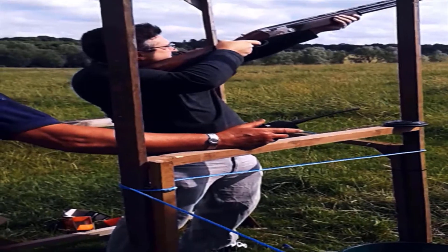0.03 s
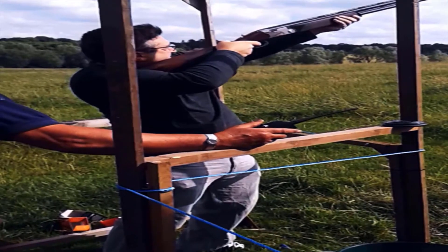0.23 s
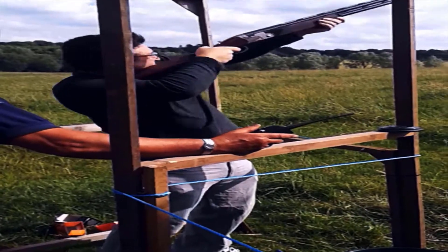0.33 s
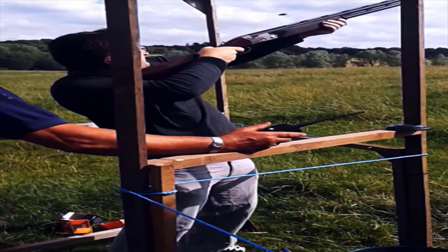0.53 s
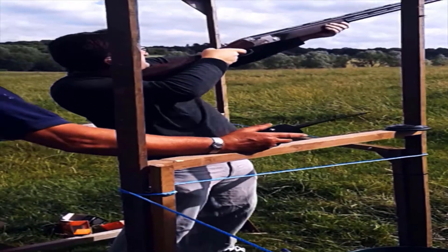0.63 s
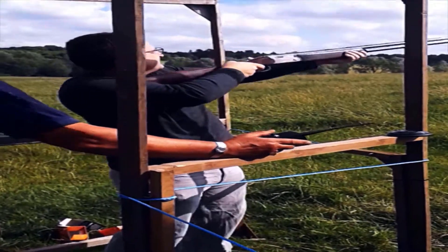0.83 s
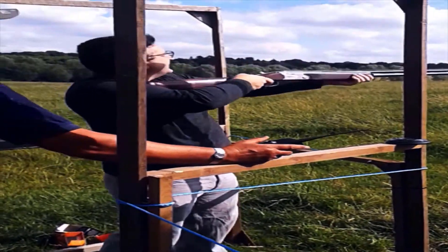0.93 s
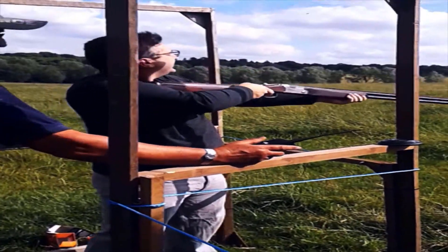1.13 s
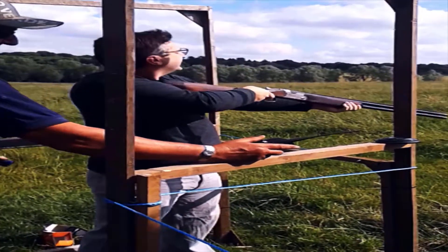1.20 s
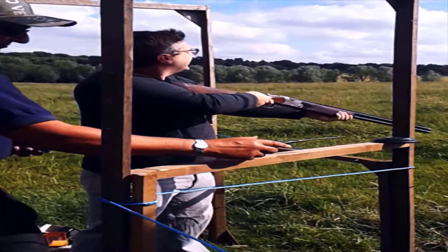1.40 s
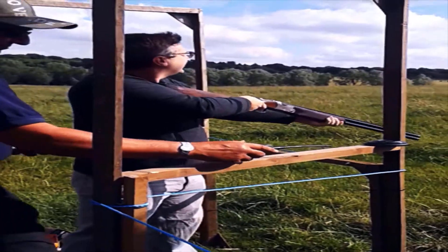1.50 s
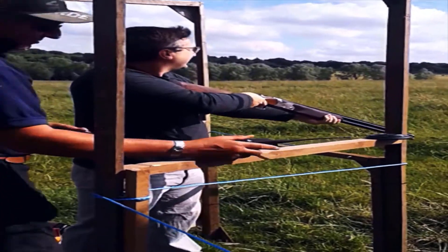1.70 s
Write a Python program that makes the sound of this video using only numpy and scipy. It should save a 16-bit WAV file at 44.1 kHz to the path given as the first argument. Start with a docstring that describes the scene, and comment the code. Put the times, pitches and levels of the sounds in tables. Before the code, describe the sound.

A single shotgun shot goes off in an open field, so close that it overloads the microphone. A sharp metallic snap just precedes it; afterwards a bright wash, a low rumble and a duller echo roll back from distant trees.

```python
"""One shotgun shot from a wooden stand in an open field, very close to the microphone.
A sharp snap, likely the gun's action, comes first; then the blast, a crack and a slowing pressure
surge, overloads the microphone and pins it for a few hundredths of a second. A bright wash scatters
back from the field over a low rumble, and a duller echo rolls in from the tree line.
Two faint pings sound as the gun is lowered; a faint breeze lies under it all."""
import sys
import numpy as np
from scipy import signal
from scipy.fft import rfft, irfft
from scipy.io import wavfile
from scipy.ndimage import uniform_filter1d

SR = 44100
rng = np.random.default_rng(int(sys.argv[2]) if len(sys.argv) > 2 else 0)


def file_out(sig):
    """Save sig as 16-bit WAV at sys.argv[1]."""
    # one column per channel
    cols = np.atleast_2d(sig).T
    # limit, then scale
    lim = np.clip(cols, -1, 1)
    pcm = np.round(lim * 32767).astype(np.int16)
    wavfile.write(sys.argv[1], SR, pcm)


N = 77175
TIME = np.arange(N) / SR


def amp(db):
    """Decibels to gain."""
    return 10 ** (np.asarray(db) / 20)


def unit(x):
    """Scales to an rms of one."""
    return x / np.sqrt(np.mean(x ** 2) + 1e-20)


def at_hz(points, hz):
    """Reads a table on a logarithmic frequency axis."""
    freqs, values = np.transpose(points)
    return np.interp(np.log(hz + 1), np.log(freqs), values)


def envelope(points):
    """Gain over time from a table of levels."""
    return amp(np.interp(TIME, *np.transpose(points)))


def fade(t, t60):
    """Holds until time zero, then falls 60 dB every t60 seconds."""
    return np.exp(-np.log(1000) * np.maximum(t, 0) / t60)


def strike(start, t60, rise_s):
    """A quick rise, then an exponential decay."""
    return np.clip((TIME - start) / rise_s, 0, 1) * fade(TIME - start - rise_s, t60)


def pan_left(db):
    """Gains that shift a sound to the left."""
    return amp([[db / 2], [-db / 2]])


def noise(colour, likeness):
    """Stereo noise of rms one with a given spectrum and left-right likeness."""
    hz = np.fft.rfftfreq(N, 1 / SR)
    mid, side = rfft(rng.standard_normal((2, N)))
    alike = np.clip(at_hz(likeness, hz), -1, 1)
    mid, side = mid * np.sqrt(1 + alike), side * np.sqrt(1 - alike)
    return unit(irfft(np.array([mid + side, mid - side]) * amp(at_hz(colour, hz)), N))


def steady(x, size):
    """Evens out chance swells over size samples, so that the envelope rules."""
    return x / np.sqrt(uniform_filter1d((x ** 2).mean(0), size))


def shaped(x, gain, patchy_db):
    """Applies gain(hz, t), with random patches where reflections interfere."""
    hz, t, spectra = signal.stft(x, SR, nperseg=512)
    patches = uniform_filter1d(rng.standard_normal(spectra.shape[1:]), 3, axis=0)
    patches = unit(uniform_filter1d(patches, 8, axis=1))
    spectra = spectra * gain(hz[:, None], t) * unit(amp(patchy_db * patches))
    return signal.istft(spectra, SR, nperseg=512)[1][:, :N]


def flicker(depth_db, size):
    """Random level changes as reflections arrive in clumps."""
    drift = uniform_filter1d(rng.standard_normal(N), size)
    return amp(depth_db * unit(uniform_filter1d(drift, size)))


# Left-right likeness of sounds near the centre, the far echoes among them: freq_hz, correlation
NARROW = [(100, 1), (400, 1), (1400, 0.77), (3000, 0.58), (10000, 1)]
# Spectrum of the open air: freq_hz, relative_db
BREEZE_SPECTRUM = [(30, -6), (85, -1), (250, -10.5), (1000, -25), (4000, -29), (16000, -31)]

def breeze():
    """Faint, steady air over the field, in mono."""
    return amp(-76.5) * noise(BREEZE_SPECTRUM, NARROW)[0]


# Snaps right by the microphone: start_s, level_db
ACTION_SNAPS = [(0.2037, -18.5), (.206, -6), (0.2057, -6), (0.2112, -21.5)]
# Spectra of the snap and of its ring: freq_hz, relative_db
SNAP_SPECTRUM = [(40, -34), (200, -2), (650, 4.5), (1200, -4), (2100, -18), (2900, -8.5), (4100, -30),
                 (6500, -21), (11000, -14.5), (16000, -25)]
RING_SPECTRUM = [(60, -24), (350, -13), (750, 14), (1700, -12), (2900, -16), (4000, -2), (6500, -11),
                 (11000, -18), (16000, -21)]

def action():
    """A tight cluster of metallic snaps with a short ring, close and dead centre."""
    hits = sum(amp(db) * strike(start, t60=.013, rise_s=.0006) for start, db in ACTION_SNAPS)
    snaps = hits * steady(noise(SNAP_SPECTRUM, NARROW)[:1], size=130)
    ring = amp(-28) * strike(ACTION_SNAPS[1][0], t60=.13, rise_s=.0006)
    return snaps + ring * steady(noise(RING_SPECTRUM, NARROW)[:1], size=200)


RECOVER_S, RECOVER_RISE_S = .2861, .012  # the microphone hears again after the blast
# Left-right likeness around the stand, wide in the treble: freq_hz, correlation
WIDE = [(40, 0.98), (200, 0.71), (700, .68), (1500, 0.05), (3000, 0.02), (12000, 0.03)]
# Spectrum of the crack at the muzzle: freq_hz, relative_db
CRACK_SPECTRUM = [(100, -15), (550, 4), (1500, -1), (3500, -8.5), (6000, -20), (9000, -17.5), (16000, -35)]

def blast():
    """The muzzle crack at close range, then a pressure surge that swings more slowly as it dies."""
    crack = amp(15) * strike(.227, t60=.017, rise_s=.00024)
    crack = crack * steady(noise(CRACK_SPECTRUM, WIDE), size=100)
    surge_s, first_hz, last_hz, sag_s = .2308, 141.3, 25.4, .01496
    lag_s = np.array([[.00058], [0]])  # the surge reaches the left port a little later
    age = np.maximum(TIME - surge_s - lag_s, 0)
    hz = last_hz + (first_hz - last_hz) * np.exp(-age / sag_s)
    phase = 2 * np.pi * np.cumsum(hz * (age > 0), axis=1) / SR
    level = amp(4) * fade(age, t60=.28) * fade(TIME - RECOVER_S, t60=.16)
    return crack + level * np.sin(phase)


NEAR_LEFT_DB = 1.9
# Spectrum of the scatter off the field: freq_hz, relative_db
WASH_SPECTRUM = [(40, 0.5), (150, 4), (400, 2.5), (800, -4), (2000, -7.5), (4000, -9), (8000, -13.5),
                 (12000, -15), (16000, -20)]
# Its decay by band: freq_hz, t60_s
WASH_DECAY = [(100, 2.63), (500, 1.21), (2000, 2.6), (4000, 2.05), (8000, 1.25), (14000, 1.04)]
# Strong reflections near the stand: start_s, level_re_wash_db, t60_s
NEAR_REFLECTIONS = [(0.292, -10, 0.03), (0.336, -5, 0.087), (0.452, -7.5, 0.17)]

def field_wash():
    """Bright scatter from the ground and the stand; the top treble dies first."""
    scatter = noise(WASH_SPECTRUM, WIDE)
    wash = shaped(scatter, lambda hz, t: fade(t - RECOVER_S, at_hz(WASH_DECAY, hz)), patchy_db=2)
    swells = sum(amp(db) * strike(start, t60, rise_s=.0037) for start, db, t60 in NEAR_REFLECTIONS)
    return amp(-10.5) * (1 + swells) * wash * flicker(depth_db=.5, size=160) * pan_left(NEAR_LEFT_DB)


FAR_FADE_S = 1.015  # from here the hiss fades and the tree line echo dulls
# Spectrum of the distant hiss: freq_hz, relative_db
HISS_SPECTRUM = [(1000, 0.5), (4000, -7), (8500, -3), (9500, -18.5), (16000, -13.5)]

def far_hiss():
    """A faint hiss under the echoes that holds, then slowly fades."""
    return amp(-56.5) * fade(TIME - FAR_FADE_S, t60=6.6) * noise(HISS_SPECTRUM, NARROW)


# Course of the boom across the field: time_s, level_db
BOOM_LEVELS = [(.29, -8), (.37, -15), (.5, -16), (.75, -15.5), (.96, -17.5), (1.04, -24.5), (1.18, -20),
               (1.32, -30), (1.52, -29.5), (1.75, -39.5)]
# Low thuds coming back from far away: start_s, level_db, t60_s
FAR_THUDS = [(.605, -23.5, .2), (1.105, -20.5, 0.21), (1.233, -23.5, .15), (1.373, -23, 0.18),
             (1.49, -30.5, 0.26)]
# Spectra of the boom and of the thuds: freq_hz, relative_db
BOOM_SPECTRUM = [(10, -8.5), (25, -7), (45, 3.5), (80, -7), (130, -14), (220, -19), (500, -62), (2000, -78)]
THUD_SPECTRUM = [(20, -21), (70, -15), (150, 1.5), (250, -17.5), (600, -21.5), (3000, -65)]

def rumble():
    """The low boom rolling over the field, with a few far thuds."""
    boom = envelope(BOOM_LEVELS) * steady(noise(BOOM_SPECTRUM, WIDE), size=2600)
    hits = sum(amp(db) * strike(start, t60, rise_s=.0046) for start, db, t60 in FAR_THUDS)
    thuds = hits * steady(noise(THUD_SPECTRUM, NARROW), size=1500)
    return (boom + thuds) * pan_left(NEAR_LEFT_DB)


def air_loss(hz, t):
    """Gain left after the long way through the air, which soaks up treble."""
    db_per_s_khz, top_hz = 8.5, 4300
    khz = np.minimum(hz, top_hz) / 1000
    return amp(-db_per_s_khz * khz * np.maximum(t - FAR_FADE_S, 0))


# Course of the echo from the tree line: time_s, level_db
ECHO_LEVELS = [(.4, -46), (.56, -25.5), (.66, -26), (.685, -33.5), (.71, -27), (.82, -29), (.94, -22.5),
               (1.06, -23.5), (1.2, -20.5), (1.36, -23.5), (1.55, -29), (1.75, -31)]
# Its spectrum before the air dulls it: freq_hz, relative_db
ECHO_SPECTRUM = [(50, -8.5), (170, 1.5), (350, -1), (650, -4.5), (1100, 2), (2100, -1), (3200, -8.5),
                 (5000, -19.5), (8500, -29.5), (10000, -58), (16000, -70)]

def tree_line():
    """A long, far echo, duller the farther it has travelled."""
    roll = shaped(noise(ECHO_SPECTRUM, NARROW), air_loss, patchy_db=2.5)
    return roll * envelope(ECHO_LEVELS) * flicker(depth_db=1.5, size=220)


# Single slaps off the tree line: start_s, level_db, t60_s, centre_hz
TREE_SLAPS = [(0.554, -23, 0.22, 2180), (.696, -18, .05, 1690), (0.704, -19.5, 0.045, 2040),
              (0.906, -27, 0.064, 3400), (1.023, -19, 0.045, 1580), (1.058, -23, 0.12, 1840),
              (1.209, -19.5, .06, 2500), (1.4, -25.5, 0.05, 1210), (1.537, -32, .09, 1090),
              (1.6, -27.5, 0.073, 1020), (1.618, -39, .07, 2660)]

def slaps():
    """Distinct returns of the shot, each strongest around its own frequency."""
    below_db_per_octave, above_db_per_octave = 9, 23.5
    returns = np.zeros((2, N))
    for start, db, t60, hz in TREE_SLAPS:
        colour = [(hz / 16, -4 * below_db_per_octave), (hz, 0), (hz * 16, -4 * above_db_per_octave)]
        returns += amp(db) * strike(start, t60, rise_s=.0022) * steady(noise(colour, NARROW), size=300)
    return returns


# Thin pings at the stand: start_s, level_db, rise_s, t60_s
GUN_PINGS = [(1.333, -47, .002, .06), (1.373, -50.5, .014, 0.1)]

def pings(pitch_hz=8100):
    """Two faint high pings as the gun is lowered."""
    level = sum(amp(db) * strike(start, t60, rise) for start, db, rise, t60 in GUN_PINGS)
    return level * np.sin(2 * np.pi * pitch_hz * TIME)


def scene():
    """The shot, then its echoes once the microphone has recovered, over a faint breeze."""
    shot = action() + blast()
    field = field_wash() + far_hiss() + rumble()
    trees = (tree_line() + slaps()) * pan_left(db=1.6)
    recovered = np.clip((TIME - RECOVER_S) / RECOVER_RISE_S, 0, 1)
    return shot + recovered * (field + trees) + pings() + breeze()


def record(dry):
    """This close to the gun the microphone saturates; a low-pass then trims the highest treble."""
    ceiling, cutoff_hz = .34, 15950
    clipped = dry / (1 + (dry / ceiling) ** 4) ** .25
    lowpass = signal.firwin(255, cutoff_hz, window=("kaiser", 9), fs=SR)
    return signal.oaconvolve(clipped, lowpass[None], "same")


dry = scene()
out = record(dry)
file_out(out)
```